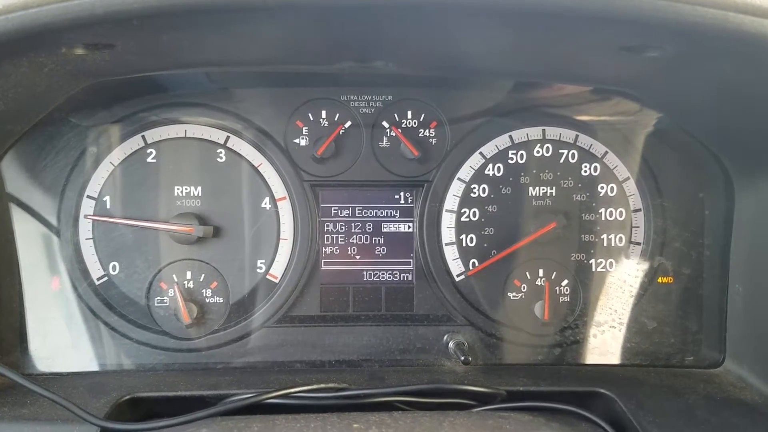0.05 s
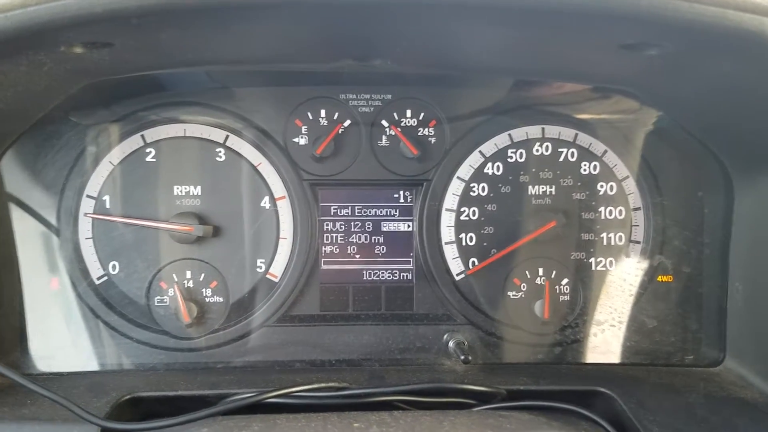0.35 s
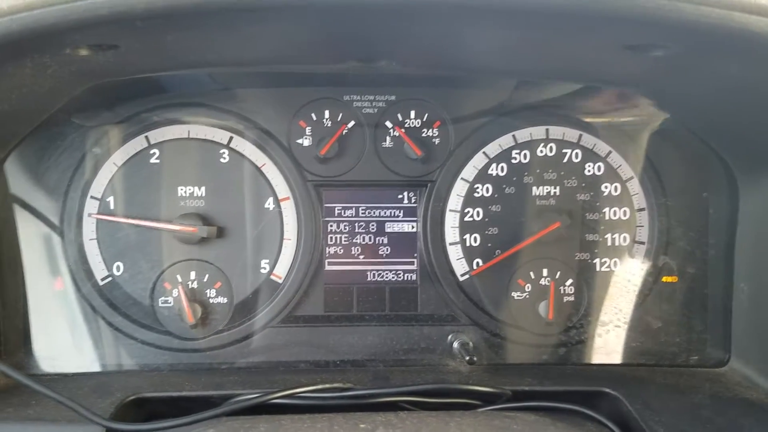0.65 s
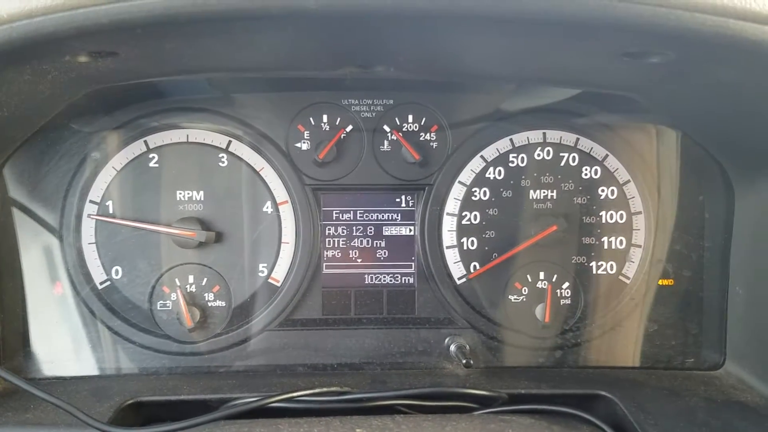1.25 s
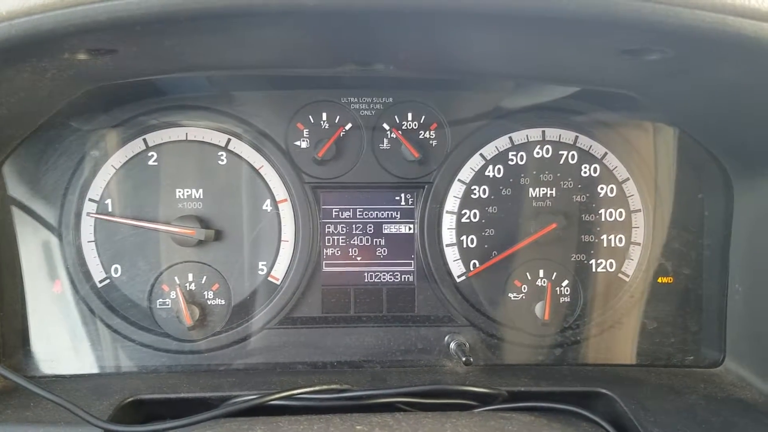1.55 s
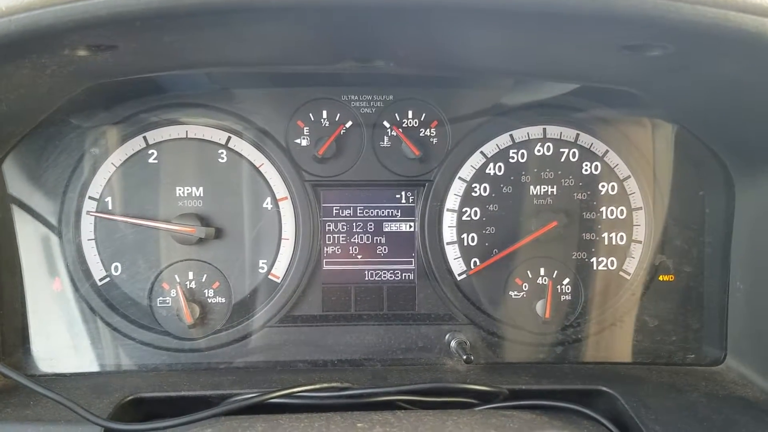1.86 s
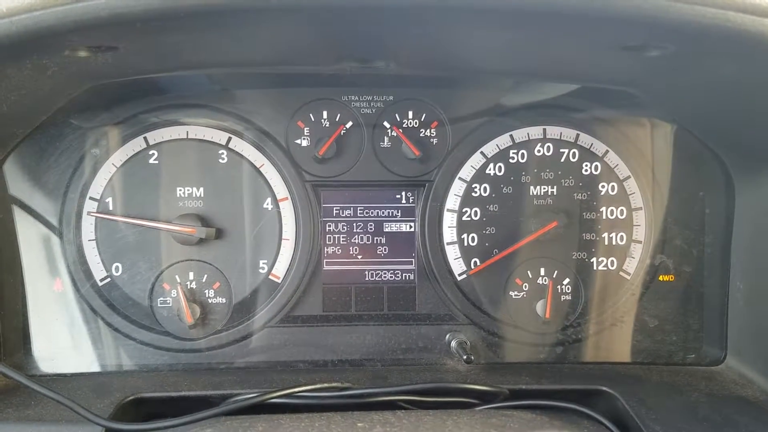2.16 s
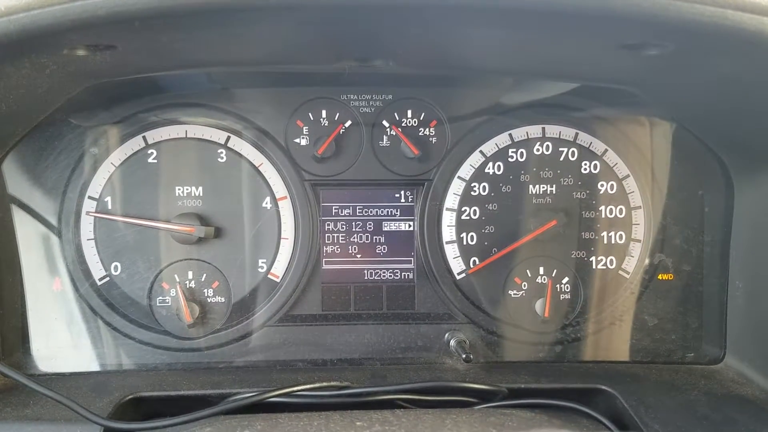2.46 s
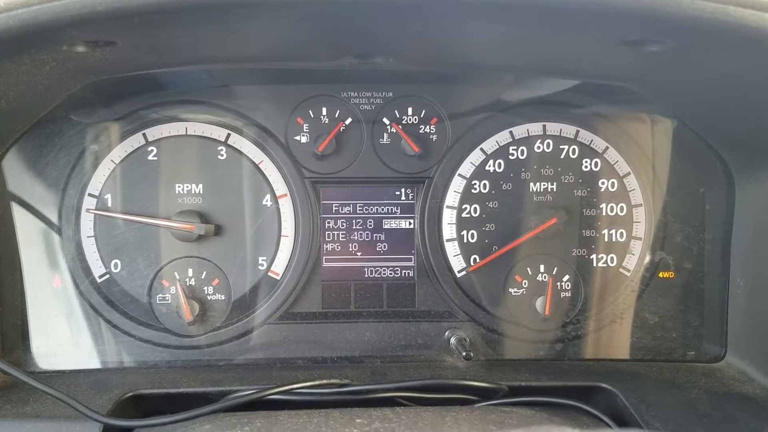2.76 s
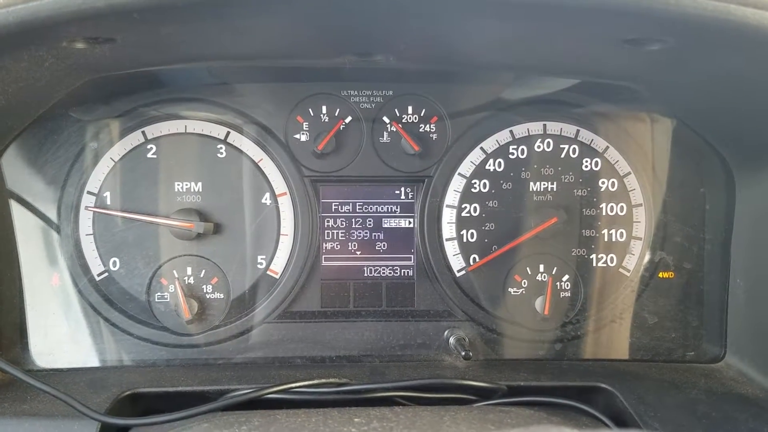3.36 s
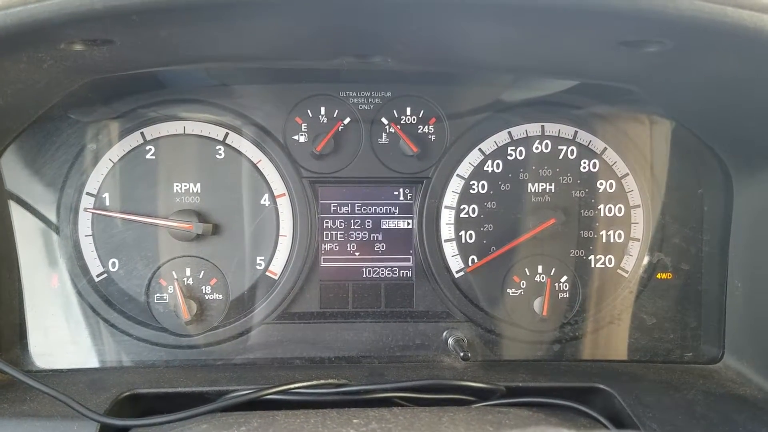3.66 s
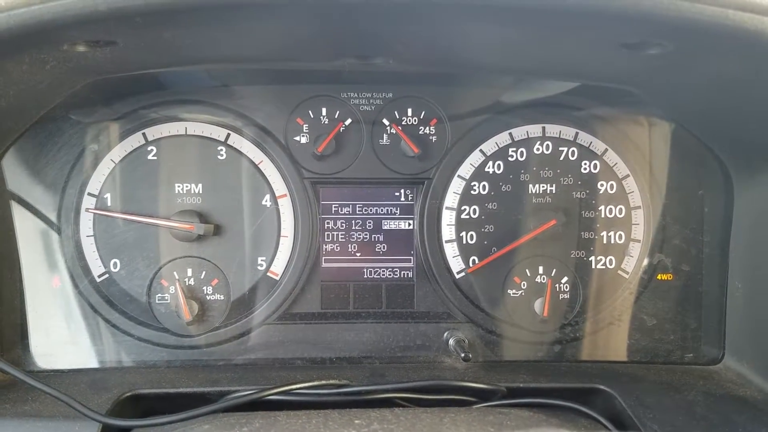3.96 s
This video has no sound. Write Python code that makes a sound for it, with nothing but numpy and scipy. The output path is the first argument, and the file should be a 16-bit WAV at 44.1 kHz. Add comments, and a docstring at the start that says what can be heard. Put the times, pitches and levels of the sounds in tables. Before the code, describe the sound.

A diesel pickup engine idles steadily, heard from the driver's seat with the cab closed. Its low, pulsing rumble carries muffled knocking and clatter under a faint hiss, with a few small ticks in the first half.

```python
"""A six-cylinder diesel pickup idles at about 830 rpm, heard from the driver's seat, cab closed.
From the start the firings boom in the cab, muffled knock and clatter come through the firewall under
a faint hiss, and one hard cylinder thumps the body once a cycle. The idle sags at 0.3 s; small ticks
and a swell of hiss follow, then the revs lift at 1.1 s and settle. More ticks fall around 2 s, and a
faint squeak comes just before the end."""
import sys
import numpy as np
from scipy import signal
from scipy.fft import rfft, irfft
from scipy.io import wavfile
from scipy.ndimage import uniform_filter1d

SR = 44100
rng = np.random.default_rng(int(sys.argv[2]) if len(sys.argv) > 2 else 0)


def wav_record(signal):
    """Record a signal, one row per channel, as 16-bit PCM in the file named by sys.argv[1]."""
    frames = np.transpose(np.atleast_2d(signal))
    bounded = np.clip(frames, -1, 1)
    # unit amplitude maps onto the largest positive 16-bit level
    quanta = np.round(bounded * 32767).astype(np.int16)
    wavfile.write(sys.argv[1], SR, quanta)


N = 176400

# crank speed: t/s, speed/rpm
IDLE_SPEED = [(0, 822), (.3, 793), (.7, 840), (.9, 826), (1.1, 874), (1.45, 827), (2.1, 835), (2.4, 814),
              (2.6, 841), (3.0, 831), (3.3, 823), (4.0, 835)]
# rumble bed of the cab: f/Hz, level/dB per Hz
CAB_RUMBLE = [(15, -86), (31, -80.5), (45, -63), (58, -67), (85, -51.5), (118, -45), (145, -55), (200, -59),
              (300, -71), (600, -110)]
# firing tones, the sub first, then the drone: multiple of the cycle rate, level/dB
FIRING_TONES = [(6, -32.5), (12, -22), (18, -27.5), (24, -42)]
# fader ride on the sub: t/s, gain/dB
SUB_RIDE = [(0, -9), (.45, -6.5), (.75, 2), (.88, -8), (1.05, 3), (1.3, 0), (1.45, -8), (2, -5), (2.3, -13),
            (2.6, -6.5), (3.2, -8), (4, -13.5)]
# fader ride on the drone: t/s, gain/dB
DRONE_RIDE = [(0, -0.5), (.3, -2.5), (.45, 0), (.85, -2.5), (1.0, 0), (2.2, -1), (2.45, 0), (4, 1)]
# weaker tones from unequal cylinders: multiple of the cycle rate, level/dB
UNEVEN_TONES = [(7, -54.5), (8, -63.5), (9, -49.5), (10, -48.5), (13, -47), (14, -38), (15, -42),
                (16, -41.5), (17, -41), (20, -46), (21, -46), (22, -45.5), (23, -54.5), (25, -43.5),
                (26, -53.5), (27, -41.5), (28, -42), (29, -41), (31, -47.5), (33, -47.5), (34, -50),
                (35, -47.5)]
# accents of the six cylinders in firing order: relative level/dB
CYLINDER_ACCENTS = [-1, -1.5, -3.5, -1, -1.5, -0.5]
# knock through the firewall, mid and side: f/Hz, level/dB per Hz
KNOCK_MID_EQ = [(100, -68.5), (180, -59), (290, -60), (330, -64), (440, -69.5), (490, -67.5), (535, -63),
                (590, -67.5), (650, -70), (690, -66), (727, -73.5), (760, -66.5), (808, -71), (858, -71),
                (895, -71.5), (1000, -86), (1400, -88.5), (3000, -125)]
KNOCK_SIDE_EQ = [(100, -70.5), (200, -62.5), (300, -66), (360, -71), (420, -77), (465, -82), (520, -65),
                 (620, -83), (805, -64.5), (950, -80.5), (1100, -78.5), (1400, -72), (3000, -125)]
# injector and valve clatter, mid and side: f/Hz, level/dB per Hz
CLATTER_MID_EQ = [(500, -105), (950, -78), (1130, -83), (1250, -75.5), (1480, -84.5), (1590, -84.5),
                  (1820, -84.5), (2140, -79.5), (2650, -87), (3500, -94.5), (5000, -105), (7000, -115),
                  (12000, -140)]
CLATTER_SIDE_EQ = [(500, -100), (950, -79), (1080, -69.5), (1180, -80), (1320, -74.5), (1510, -86.5),
                   (1870, -84), (2240, -82.5), (2600, -87), (3000, -91), (3350, -88), (4000, -98.5),
                   (5000, -105), (7000, -116), (12000, -140)]
# metal parts ringing in the clatter: f/Hz, width/Hz, boost/dB
METAL_RINGS = [(1223, 52, 4.5), (1616, 44, 6.5), (1746, 27, 9.5), (1930, 40, 6.5), (2010, 11, 6),
               (2086, 30, 4.5)]
# colour of the hiss: f/Hz, level/dB per Hz
HISS_EQ = [(2500, -112), (3800, -100), (4500, -101), (5000, -105), (6500, -106.5), (8000, -104),
           (9000, -117), (11000, -112), (13000, -109), (15500, -106)]
# fader ride on the hiss: t/s, gain/dB
HISS_RIDE = [(0, -4), (.22, -4), (.3, -1), (.56, -1), (.64, 5.5), (.74, 3), (.83, 4.5), (1.0, 2),
             (1.12, -1.5), (1.21, 1), (1.28, -3), (1.52, -2.5), (1.64, 1.5), (2.05, 1), (2.5, 3), (2.7, -1),
             (3.1, -3), (4, -2)]
# body panels rung by the hard cylinder: f/Hz, t60/s, relative level/dB
BODY_PANELS = [(191.6, 0.15, -5.5), (244, .08, -8), (276.8, 0.14, 1.5), (293, .06, -3.5), (356, 0.074, -12),
               (539.4, 0.16, -10.5), (683, 0.16, -13.5), (759, 0.093, -19.5)]
# tick cues: t/s, level/dB, f/Hz, width/Hz, decay/s
TICK_CUES = [(.495, -43.5, 3200, 1960, 0.0085), (.498, -55, 6100, 3000, .007),
             (0.596, -55.5, 6960, 7000, 0.0054), (1.931, -48.5, 11700, 450, 0.0022),
             (1.929, -59, 9000, 5070, .004), (2.155, -61, 12500, 6000, 0.0044),
             (3.845, -65, 6000, 217, 0.042)]

FIRST_FIRING_CYCLES, KNOCK_LAG_CYCLES, THUMP_LAG_CYCLES = .065, .029, .0646
FIRING_WOBBLE, UNEVEN_WOBBLE = .07, .24  # shares of the level
BOOM_PAN_DB, BOOM_WIDTH = 2.5, .17
KNOCK_REPEAT = .55  # share of the power that loops every cycle
CAB_RIPPLE_DB, CAB_RIPPLE_STEP_HZ = 1.85, 21.98
THUMP_DB, THUMP_SCATTER_DB, THUMP_RISE_S = -38.5, 2.5, .0082


def undb(db):
    """Decibels to gain."""
    return 10 ** (np.asarray(db) / 20)


def curve(rows):
    """Straight ramps through (t/s, value) rows."""
    return np.interp(np.arange(N) / SR, *np.array(rows, float).T)


def colour(noise, eq):
    """Shape white noise to (f/Hz, level/dB per Hz) rows, falling 24 dB an octave above the last."""
    hz, db = np.array(eq, float).T
    octave = np.log2(np.maximum(np.fft.rfftfreq(N, 1 / SR), 1))
    shape = np.interp(octave, np.log2(hz), db) - 24 * np.maximum(octave - np.log2(hz[-1]), 0)
    return irfft(rfft(noise) * undb(shape), N) * np.sqrt(SR / 2)


def drift(rate_hz):
    """Slow random modulation with a spread of 1."""
    hold = int(SR / rate_hz)
    steps = np.repeat(rng.standard_normal(N // hold + 1), hold)
    smooth = uniform_filter1d(uniform_filter1d(steps, hold), hold)[:N]
    return smooth / smooth.std()


def stereo(mid, side, pan_db):
    """Mid and side to left and right; a positive pan leans left."""
    return np.array([mid + side, mid - side]) * undb(np.array([[pan_db], [-pan_db]]) / 2)


def tones(cycles, rows, wobble, drift_hz, spread_rad=0):
    """Harmonics of the engine cycle, wavering in level and phase; the higher ones sit wider."""
    mid, side = 0, 0
    for multiple, db in rows:
        phase = 2 * np.pi * multiple * cycles + spread_rad * rng.standard_normal()
        waver = 1 + wobble * (drift(drift_hz) + 1j * drift(drift_hz))
        tone = np.sqrt(2) * undb(db) * waver * np.exp(1j * phase)
        mid += tone.real
        side += BOOM_WIDTH * multiple / 20 * tone.imag
    return stereo(mid, side, BOOM_PAN_DB)


def boom(cycles):
    """The low end: the firings and their unevenness drone in the cab over a soft rumble."""
    mid, side = (colour(noise, CAB_RUMBLE) for noise in rng.standard_normal((2, N)))
    rumble = stereo(mid, undb(-27) * side, BOOM_PAN_DB)
    sub = tones(cycles, FIRING_TONES[:1], FIRING_WOBBLE, drift_hz=6.35)
    surge = .0035 * np.sin(2 * np.pi * cycles)  # the crank surges once a cycle
    drone = tones(cycles + surge, FIRING_TONES[1:], FIRING_WOBBLE, drift_hz=5.96)
    uneven = tones(cycles, UNEVEN_TONES, UNEVEN_WOBBLE, drift_hz=5.17, spread_rad=1.75)
    return sub * undb(curve(SUB_RIDE)) + drone * undb(curve(DRONE_RIDE)) + uneven + rumble


def bursts(cycles, decay_firings, floor, accent):
    """Envelope of one burst per firing over a steady floor, accented by its cylinder."""
    firings = (cycles - KNOCK_LAG_CYCLES + 1) * len(CYLINDER_ACCENTS)
    index = firings.astype(int)
    accent_db = accent * np.array(CYLINDER_ACCENTS)[index % len(CYLINDER_ACCENTS)]
    scatter_db = .76 * rng.standard_normal(400)[index]
    pulse = floor + np.exp(-(firings % 1) / decay_firings)
    envelope = uniform_filter1d(undb(accent_db + scatter_db) * pulse, size=90)  # 2 ms attack
    return envelope / np.sqrt(np.mean(envelope ** 2))


def knock(cycles):
    """Combustion knock, muffled by the firewall: part the same rattle every cycle, part new."""
    envelope = bursts(cycles, decay_firings=.81, floor=.55, accent=1)
    period = int(N / (cycles[-1] - cycles[0]))
    playhead = (cycles % 1 * period).astype(int) % period
    fresh, loop = rng.standard_normal((2, 2, N))
    rattle = np.sqrt(KNOCK_REPEAT) * loop[:, playhead] + np.sqrt(1 - KNOCK_REPEAT) * fresh
    mid, side = envelope * rattle
    return stereo(colour(mid, KNOCK_MID_EQ), colour(side, KNOCK_SIDE_EQ), pan_db=-.7)


def bell(hz, width):
    """A bell curve over the spectrum, 1 at its centre."""
    return 1 / (1 + (2 * (np.fft.rfftfreq(N, 1 / SR) - hz) / width) ** 2)


def ringing(x):
    """Narrow resonances of metal parts, plus fine peaks and dips from cab reflections."""
    f = np.fft.rfftfreq(N, 1 / SR)
    ripple = np.interp(f / CAB_RIPPLE_STEP_HZ, np.arange(4096), rng.standard_normal(4096))
    metal_db = sum(boost * bell(hz, width) for hz, width, boost in METAL_RINGS)
    return irfft(rfft(x) * undb(CAB_RIPPLE_DB * ripple + metal_db), N)


def clatter(cycles):
    """Injectors and valves, smeared by the cab into a lightly pulsing rasp."""
    envelope = bursts(cycles, decay_firings=1, floor=2.9, accent=.23)
    mid, side = envelope * rng.standard_normal((2, N))
    return stereo(ringing(colour(mid, CLATTER_MID_EQ)), ringing(colour(side, CLATTER_SIDE_EQ)), pan_db=2)


def hiss():
    """A faint, wide hiss that swells and sinks on top."""
    mid, side = (colour(noise, HISS_EQ) for noise in rng.standard_normal((2, N)))
    return stereo(mid, undb(-1.2) * side, pan_db=-1) * undb(curve(HISS_RIDE))


def thump(cycles):
    """Once a cycle the hard cylinder rings the body panels, no two hits quite alike."""
    out, t = np.zeros(N + SR), np.arange(SR // 4) / SR
    attack = 1 - np.exp(-t / THUMP_RISE_S)
    for start in np.flatnonzero(np.diff(np.floor(cycles - THUMP_LAG_CYCLES)) > 0):
        for hz, t60, db in BODY_PANELS:
            weight, detune = rng.standard_normal(2)
            ring = np.sin(2 * np.pi * hz * (1 + .012 * detune) * t) * undb(-60 * t / t60)
            out[start:start + len(t)] += undb(db + THUMP_SCATTER_DB * weight) * ring * attack
    return stereo(out[:N] / out[:N].std() * undb(THUMP_DB), 0, pan_db=-2)


def ticks():
    """Small, dry, close ticks of band-passed noise; the narrowest rings as a faint squeak."""
    out, t = 0, np.arange(N) / SR
    for start, db, hz, width, decay in TICK_CUES:
        grain = irfft(rfft(rng.standard_normal((2, N))) * bell(hz, width), N)
        envelope = (t >= start) * np.exp(-np.abs(t - start) / decay)
        mid, side = grain / grain.std() * undb(db) * envelope
        out += stereo(mid, undb(-1) * side, pan_db=-1)
    return out


def scene():
    """The mix: every engine layer locks to one cycle, two turns of the crank."""
    crank_turns = np.cumsum(curve(IDLE_SPEED)) / 60 / SR
    cycles = crank_turns / 2 - FIRST_FIRING_CYCLES
    return boom(cycles) + thump(cycles) + knock(cycles) + clatter(cycles) + hiss() + ticks()


def record(dry):
    """A steep high cut at 15.6 kHz."""
    return signal.sosfilt(signal.ellip(10, .1, 80, 15600, fs=SR, output="sos"), dry)


dry = scene()
out = record(dry)
wav_record(out)
```